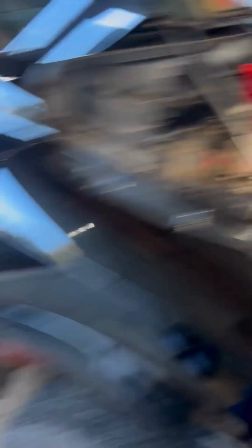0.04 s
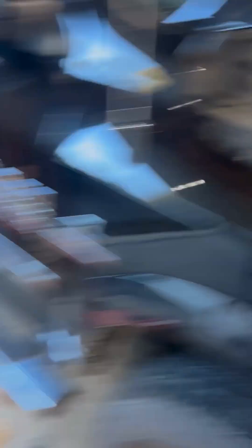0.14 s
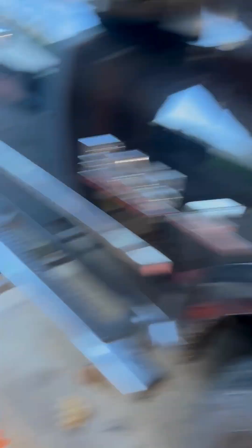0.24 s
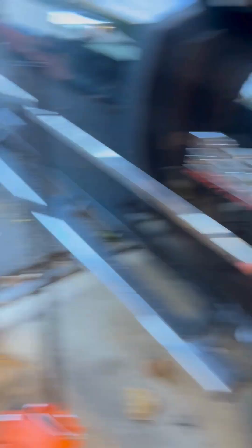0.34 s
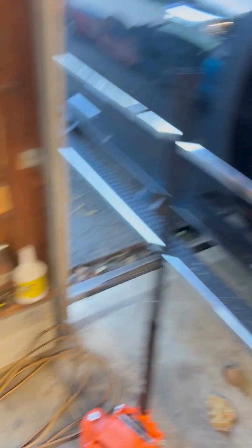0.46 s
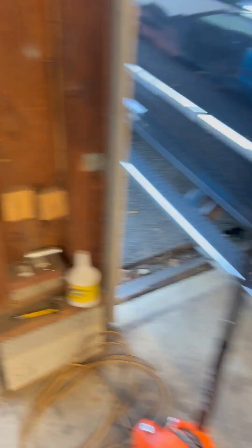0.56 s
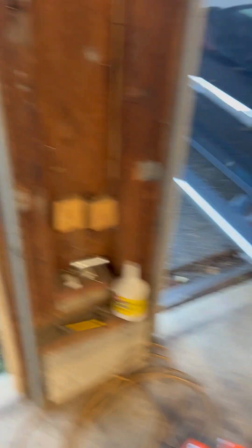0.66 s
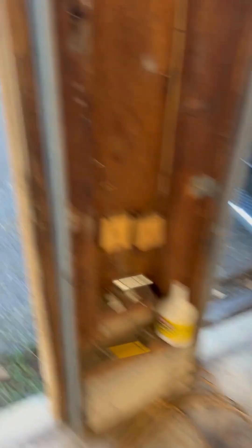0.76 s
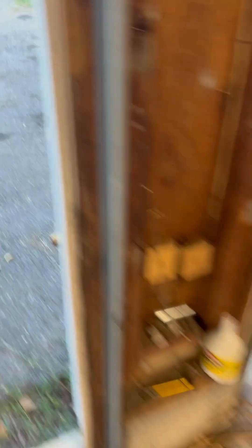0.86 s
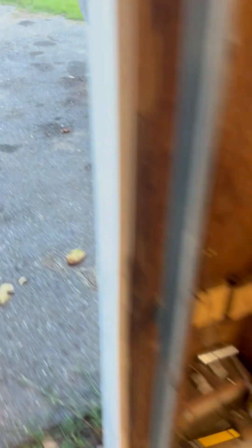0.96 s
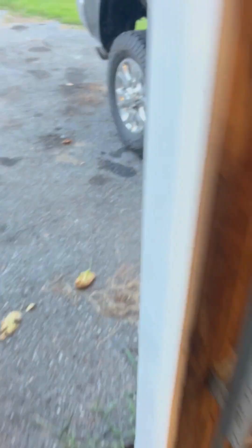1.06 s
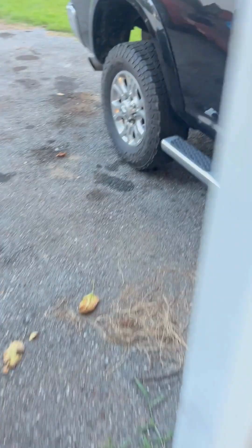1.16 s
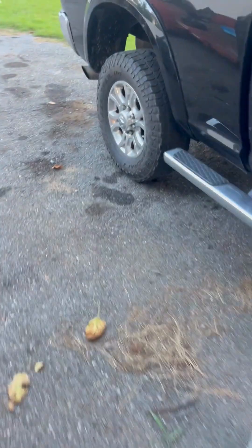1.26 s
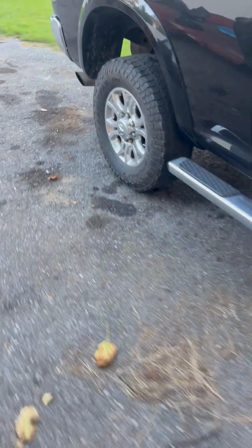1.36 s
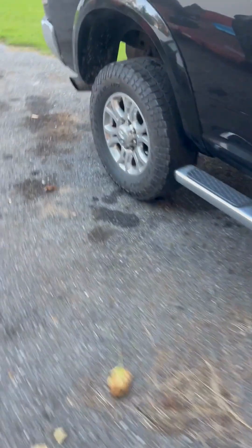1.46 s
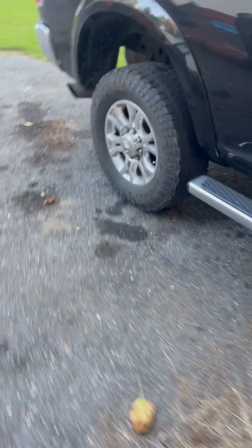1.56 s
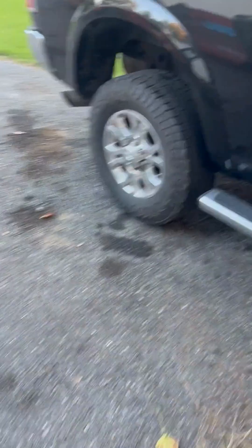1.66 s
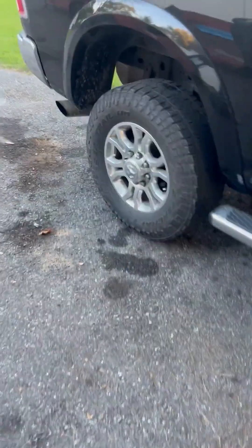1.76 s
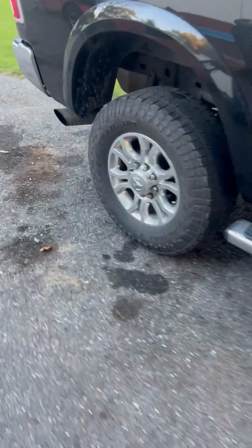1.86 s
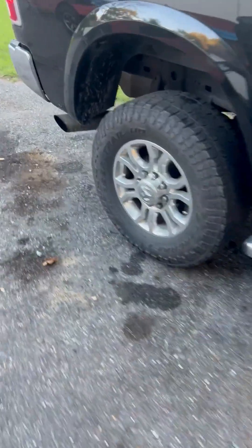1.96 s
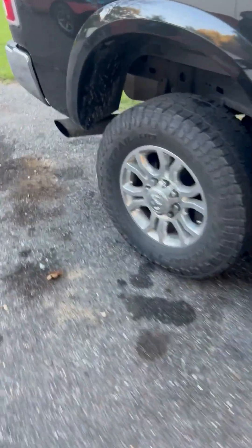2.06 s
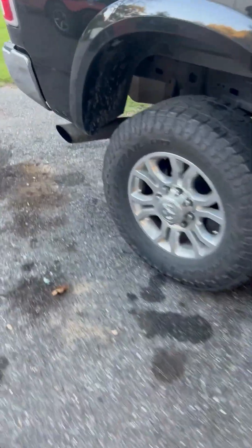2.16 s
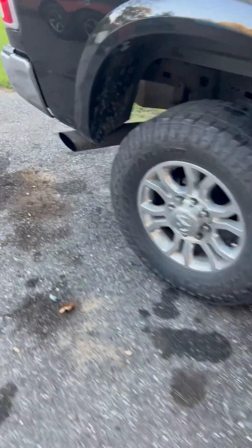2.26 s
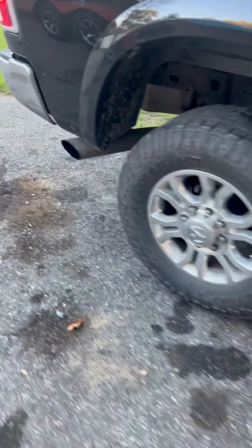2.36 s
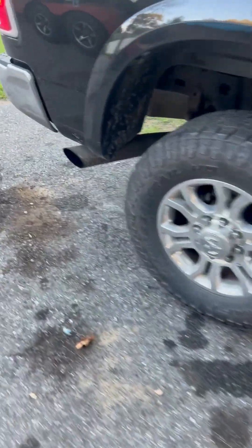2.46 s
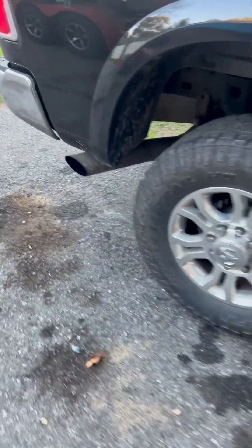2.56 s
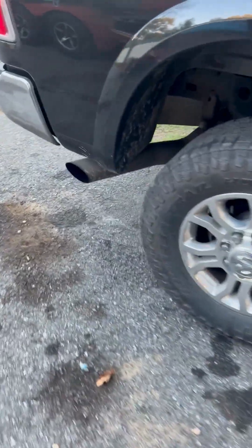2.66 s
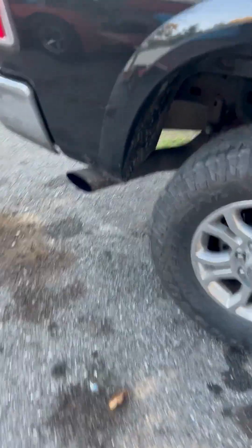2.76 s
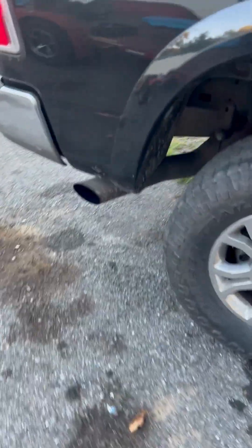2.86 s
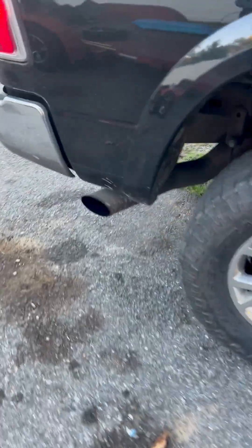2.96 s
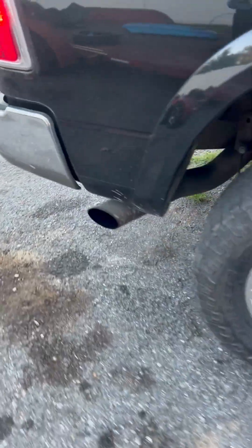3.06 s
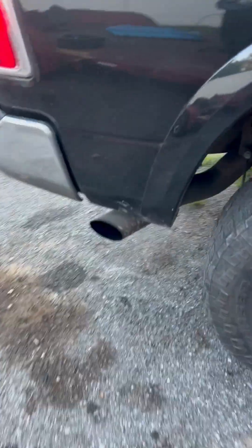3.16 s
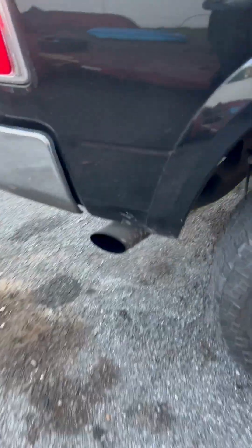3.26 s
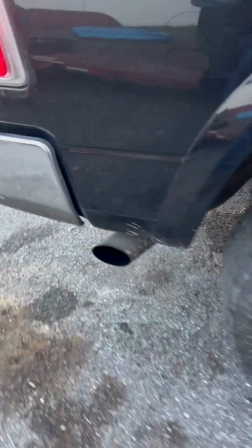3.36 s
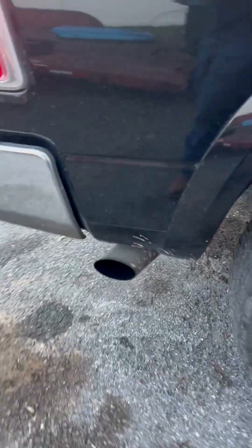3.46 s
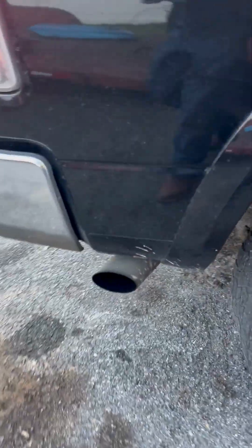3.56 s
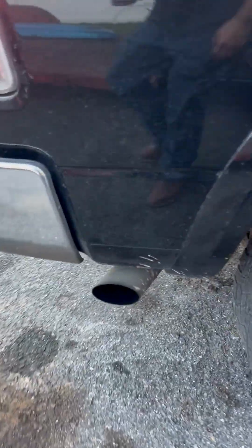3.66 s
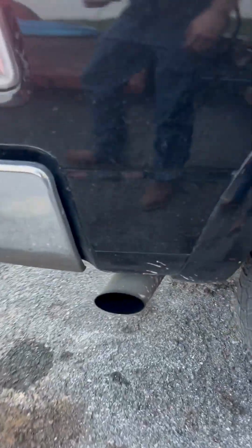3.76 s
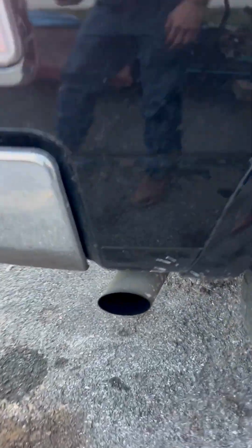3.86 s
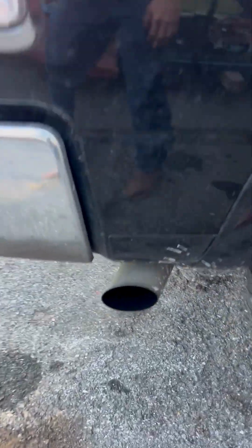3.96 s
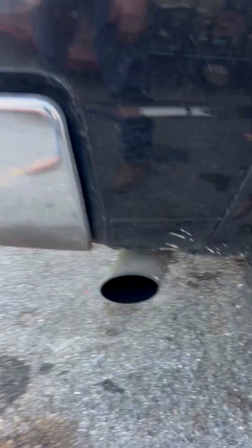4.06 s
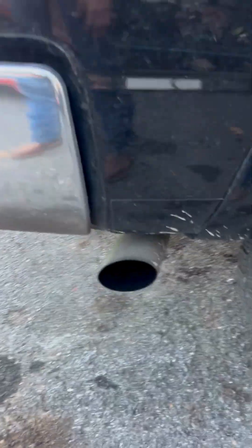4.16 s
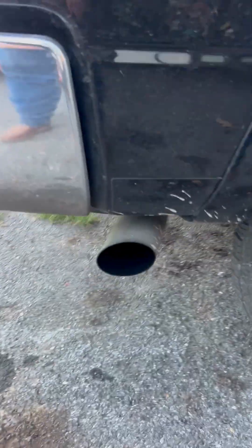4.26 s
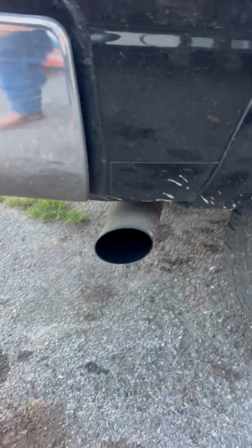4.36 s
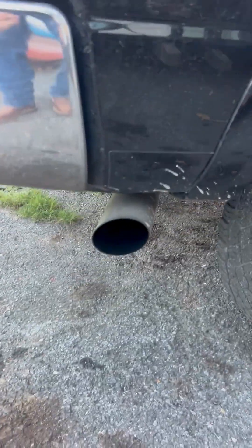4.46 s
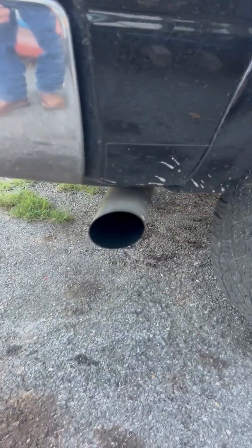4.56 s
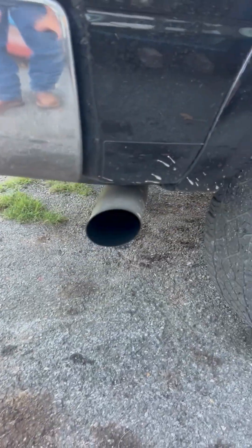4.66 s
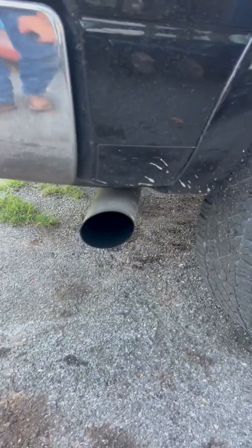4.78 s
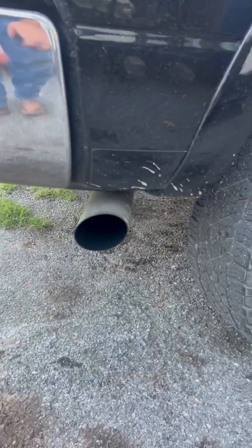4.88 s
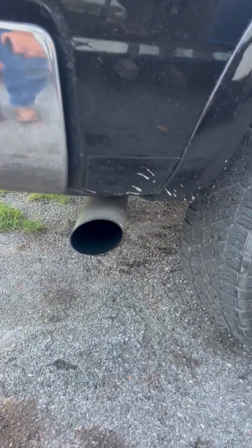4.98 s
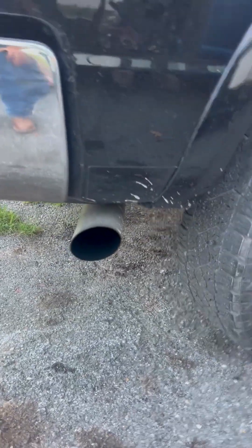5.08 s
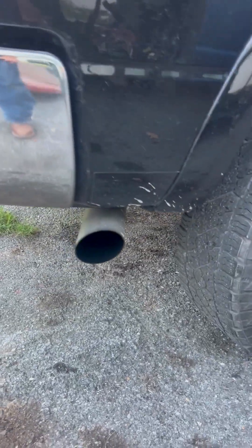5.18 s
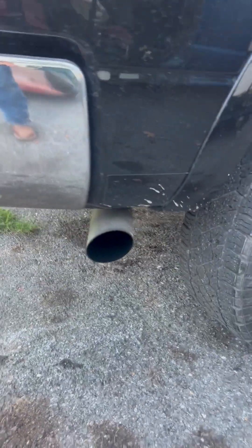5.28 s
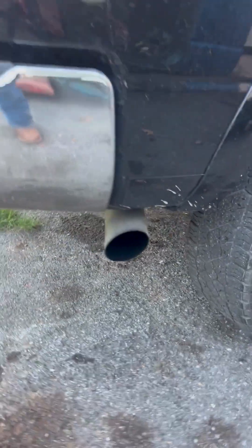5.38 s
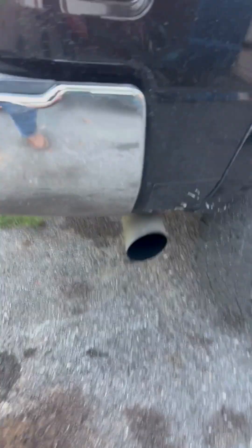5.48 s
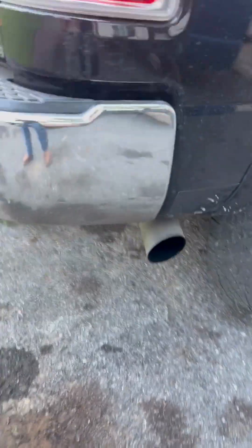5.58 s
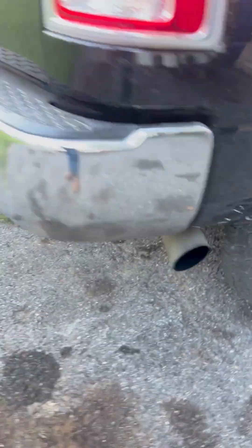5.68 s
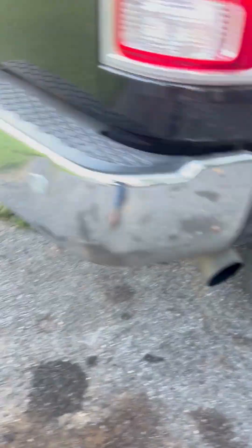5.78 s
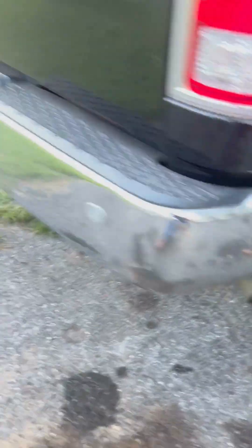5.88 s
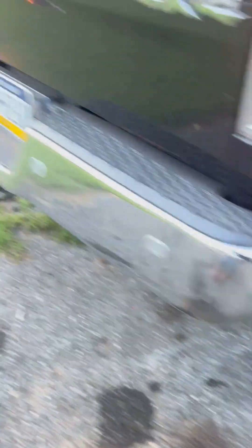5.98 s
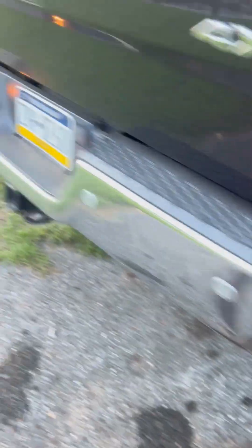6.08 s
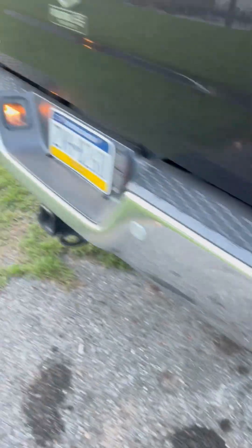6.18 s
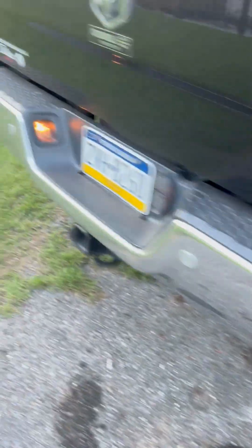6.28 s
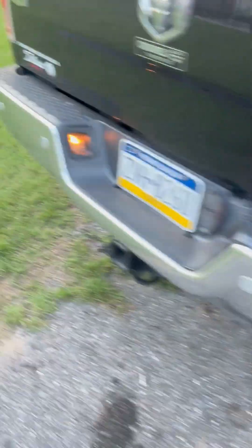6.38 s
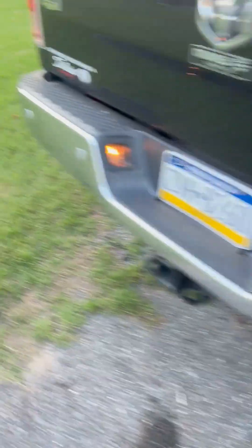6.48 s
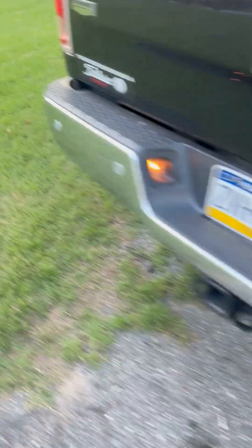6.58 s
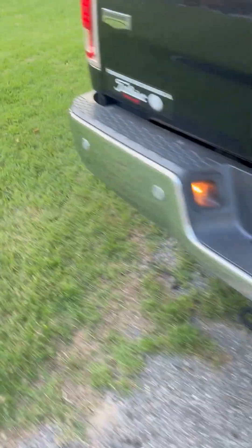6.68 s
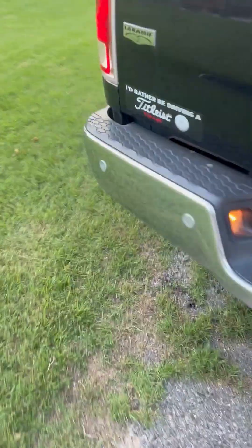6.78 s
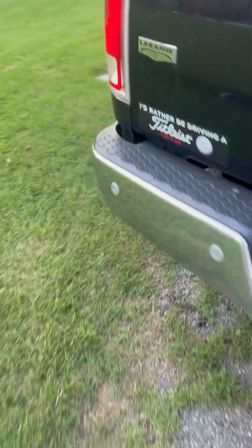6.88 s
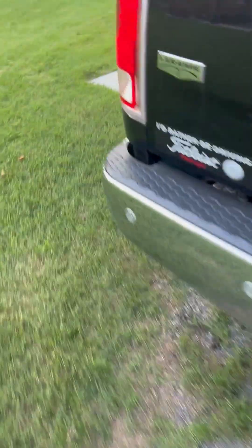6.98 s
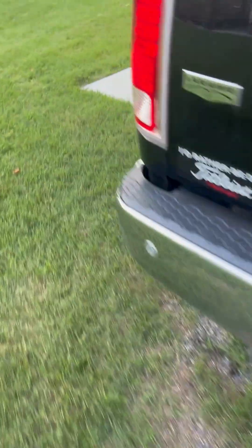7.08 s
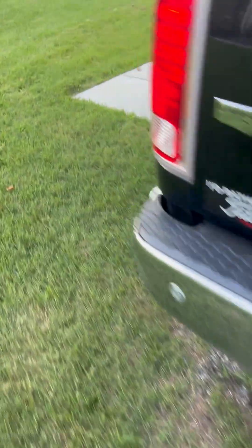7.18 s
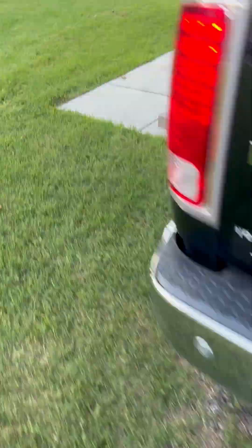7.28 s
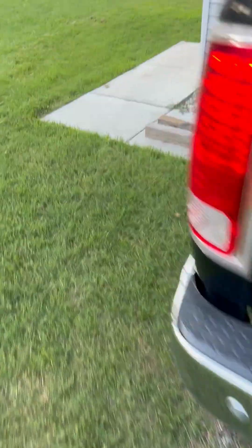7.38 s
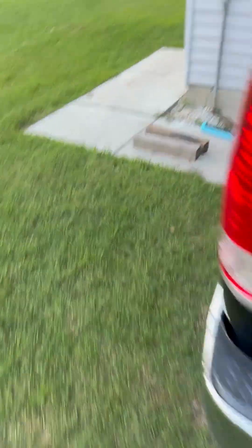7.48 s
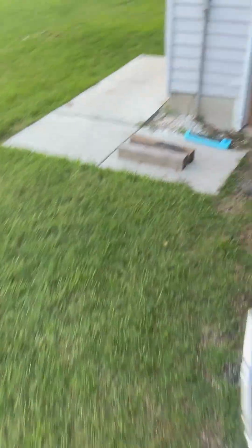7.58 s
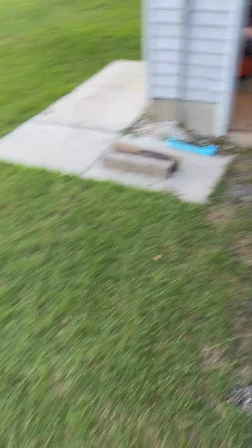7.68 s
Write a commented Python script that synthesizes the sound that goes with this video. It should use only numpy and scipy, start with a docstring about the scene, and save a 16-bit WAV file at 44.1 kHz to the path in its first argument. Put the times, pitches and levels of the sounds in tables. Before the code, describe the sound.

Continuous diesel truck idle, low and lumpy, about thirty-five firings a second. Clattering valves and a faint fan hum lead at first; very high ticks fade almost at once. The moving microphone nears the exhaust mouth, where puffing gas turns rough, airy and close, then passes behind the bumper, leaving a softer, darker boom. Open driveway, dry sound, only a slight gravel reflection.

```python
"""A deep, throbbing boom and an engine's clatter come first: a six-cylinder diesel pickup idles at 700 rpm.
The listener walks from the engine end, past the tailpipe, to behind the truck.
Each firing excites boom, drone, burble and knock resonances as an impulse; gas noise leaves in puffs.
Clatter and high ticks are noise gated by the engine cycle; the fan is a sine tone."""
import sys
import numpy as np
from scipy import signal
from scipy.fft import rfft, irfft, next_fast_len
from scipy.io import wavfile
from scipy.ndimage import uniform_filter1d

SR = 44100
rng = np.random.default_rng(int(sys.argv[2]) if len(sys.argv) > 2 else 0)


def digitize_waveform(pressure):
    """Quantize a signal to 16-bit integers and store it at the path in sys.argv[1].

    Rows of a 2-D input are taken as channels; values are limited to [-1, 1].
    """
    field = np.atleast_2d(pressure).T
    bounded = np.clip(field, -1, 1)
    quanta = np.round(bounded * 32767).astype(np.int16)
    wavfile.write(sys.argv[1], SR, quanta)


N = 340893

CYCLE_HZ = 5.845  # all six cylinders fire once in a cycle of two crank turns
# the walk: (time [s], distance to the tailpipe [m], treble loss away from the pipe's mouth [dB],
# engine clatter level [dB])
WALK = [(0, 3.3, 17, -25), (.35, 2.94, 9, -27), (1.3, 1.98, 7.5, -31), (2.1, 1.67, 6.5, -30.5),
        (2.9, 1.21, 2, -29.5), (3.6, 1.08, 0.4, -29), (4.1, 0.99, -2.2, -31), (5.2, 1.05, -0.8, -35.5),
        (5.75, 1.29, 3, -36), (6.3, 1.54, 13, -41), (6.7, 2.1, 18, -40), (7.3, 2.33, 21, -44),
        (7.73, 2.7, 19, -41)]


def gain_of(db):
    """Level definition: 20 dB is a factor of ten in amplitude."""
    return 10 ** (np.asarray(db) / 20)


def evened(x):
    """Normalization to unit root-mean-square amplitude."""
    return x / np.sqrt(np.mean(x ** 2) + 1e-20)


def along(table, t):
    """Linear interpolation in time of every column after the first."""
    s, *columns = np.transpose(table)
    return [np.interp(t, s, c) for c in columns]


def read(points, hz):
    """Linear interpolation of level on a logarithmic frequency axis."""
    f, db = np.transpose(points)
    return np.interp(np.log(hz + 1), np.log(f + 1), db)


def noise(shape_db, patchy_db):
    """Spectral shaping: random short-time spectra take the colour shape_db(hz, s) and uneven patches."""
    hop, window = 256, 1024
    frames = N // hop + 5
    hz = np.fft.rfftfreq(window, 1 / SR)[:, None]
    real, imaginary, patches = rng.standard_normal((frames, 513, 3)).T
    patches = uniform_filter1d(patches, size=4, axis=0)  # smooth over frequency
    patches = evened(uniform_filter1d(patches, size=9, axis=1))  # and over time
    frame_s = np.arange(frames) * hop / SR
    colour = gain_of(shape_db(hz, frame_s) + np.zeros(frames))
    colour = colour / np.sqrt((colour ** 2).mean(0))  # equal power in every frame
    spectra = (real + 1j * imaginary) * colour * gain_of(patchy_db * patches)
    return evened(signal.istft(spectra, nperseg=window, noverlap=window - hop)[1][:N])


def cycles(t):
    """Phase of the engine: cycles run by time t, shifted as idle speed and distance drift."""
    # lateness of the firings: (time [s], lag [ms])
    firing_lag = [(0, 3.7), (.5, 3.6), (1.1, 2.2), (1.75, .1), (2.6, -.9), (3.5, -2.5), (4.4, -1.4),
                  (5.9, 2.0), (7.1, 6.4), (7.73, 8.3)]
    return CYCLE_HZ * (t - along(firing_lag, t)[0] / 1000)


def puffs(per_cycle, late, rise, fall, uneven_db, pattern_db=(0,)):
    """Periodic amplitude modulation: each puff swells and decays; late, rise, fall are shares of a period."""
    turn = per_cycle * cycles(np.arange(N) / SR) - late + 1
    size = gain_of(uneven_db * rng.standard_normal(400) + np.resize(pattern_db, 400))

    def shape(u):
        return (1 - np.exp(-u / rise)) ** 2 * np.exp(-u / fall)

    count = turn.astype(int)
    phase = turn % 1
    previous_tail = size[count] * shape(phase + 1)
    return size[count + 1] * shape(phase) + previous_tail


def ring(modes, cylinder_db, lag_ms, uneven_db, uneven_ms):
    """Modal response: one impulse a firing is convolved with a sum of damped resonances."""
    lead = SR  # the engine runs one second ahead, so that the resonances already ring
    t = np.arange(-lead, N) / SR
    firing = np.arange(-30, 276)
    cylinder = firing % 6
    chance = rng.standard_normal((len(firing), 2))
    delay_ms = lag_ms[cylinder] + uneven_ms * chance[:, 0]
    s = np.interp(firing / 6, cycles(t), t) + delay_ms / 1000
    strength = gain_of(cylinder_db[cylinder] + uneven_db * chance[:, 1])
    size = next_fast_len(len(t) + SR)
    clicks = np.bincount(np.round(s * SR).astype(int) + lead, strength, size)
    f = np.fft.rfftfreq(size, 1 / SR)
    response = 0
    for hz, width, db, sign in modes:
        response = response + sign * gain_of(db) * 1j * f * width / (hz ** 2 - f ** 2 + 1j * f * width)
    cutoff = 1.17 * max(mode[0] for mode in modes)
    response = response / (1 + (f / cutoff) ** 6)  # the gas pulse is blunt
    return evened(irfft(rfft(clicks[:size]) * response, size)[lead:lead + N])


def heard(layer, t):
    """Spreading and directivity: a layer weakens with distance and away from the pipe's mouth."""
    # tailpipe layers: (level at 1 m with no treble loss [dB], distance exponent [-],
    # share of the treble loss [-])
    layers = {"boom": (-9, 1, .01), "drone": (-27, 0.29, 0.27), "burble": (-25.5, 1.96, 0.17),
              "rasp": (-26.5, 1.2, 0.33), "hiss": (-28.5, 1.11, 0.94)}
    db, spread, aim = layers[layer]
    metres, aside_db = along(WALK, t)[:2]
    return gain_of(db - aim * aside_db) / metres ** spread


def fan(t):
    """Pure tone: the fan's hum is one sinusoid of varying level."""
    # fan hum: (time [s], rms level [dB])
    hum_level = [(0, -35.5), (1.1, -28), (1.8, -38), (3.3, -32), (6, -39.5), (7.1, -30), (7.73, -37)]
    hum_hz = 155
    amplitude = np.sqrt(2) * gain_of(along(hum_level, t)[0])
    return amplitude * np.sin(2 * np.pi * hum_hz * t)


def ticks(t):
    """Gated narrow-band noise: a short, very high chirrup on every crank turn, fading over time."""
    start_db, fade_s = -41.5, .1
    bright = noise(lambda hz, s: -12 * np.log10(1 + ((hz - 13200) / 500) ** 2), patchy_db=-0.5)
    gate = puffs(2, late=.25, rise=.04, fall=.1, uneven_db=3.0)
    fade = 1 / (1 + t / fade_s)
    return gain_of(start_db) * fade * evened(bright * gate)


def clatter(t):
    """Modulated noise: valves, injectors and belts throb with the firings, duller close to the tailpipe."""
    # engine noise density, far from and near the tailpipe: (frequency [Hz], relative level [dB per Hz])
    far_spectrum = [(20, -8), (60, -3.5), (150, 12), (400, 8.5), (550, 6), (1000, 4), (2100, -3),
                    (2800, -16.5), (4000, -14.5), (4800, -11), (7500, -15), (9500, -20), (13000, -14),
                    (15500, -17.5)]
    near_spectrum = [(20, 3), (60, -1), (150, 10.5), (400, 10), (800, -10.5), (1300, -0.5), (1900, -9.5),
                     (2500, -10), (3300, -7.5), (4200, -17.5), (5100, -4), (8000, -22.5), (15500, -41)]
    near_m = 0.65  # at this distance from the tailpipe only the near spectrum would remain

    def colour_db(hz, s):
        nearness = np.clip(near_m / along(WALK, s)[0], 0, 1)
        return read(far_spectrum, hz) * (1 - nearness) + read(near_spectrum, hz) * nearness

    rattle = noise(colour_db, patchy_db=2.56)
    gate = 1.5 + puffs(6, late=-0.03, rise=0.12, fall=0.26, uneven_db=5.5)
    return gain_of(along(WALK, t)[2]) * evened(rattle * gate)


def ground_echo(direct, t):
    """Image source: a reflection off the gravel arrives later by the extra path length."""
    pipe_height_m, ear_height_m, sound_m_per_s = 0.243, 0.73, 343
    gravel, aside_scale_db = 0.18, 2.5  # greatest echo strength; treble loss over which it comes in
    metres, aside_db = along(WALK, t)[:2]
    detour_m = np.sqrt(metres ** 2 + 4 * pipe_height_m * ear_height_m) - metres
    strength = gravel * (1 - np.exp(-np.maximum(aside_db, 0) / aside_scale_db))
    dull = signal.lfilter(*signal.butter(1, 2400, fs=SR), direct)  # gravel scatters the treble
    return strength * np.interp(t - detour_m / sound_m_per_s, t, dull)


def tailpipe(t):
    """Pulsating flow noise: gas rushes out after each firing as rasp and hiss coloured by pipe resonances."""
    # noise density before the resonances: (frequency [Hz], relative level [dB per Hz])
    rasp_spectrum = [(150, -14.5), (330, 10.5), (520, 1.5), (700, 0.5), (1050, -2.5), (1180, -32),
                     (1330, -10), (1900, -8), (2300, -18), (3000, -29), (6000, -61)]
    hiss_spectrum = [(800, -52), (2000, -9.5), (2600, -16.5), (3100, -2.5), (4000, -6), (5000, -6),
                     (6500, -11), (8500, -5.5), (12500, -8.5), (15500, -2)]
    # pipe resonances: (frequency [Hz], width [Hz], height [dB])
    pipe_resonances = [(714, 170, 3.6), (929, 52, 7.8), (1068, 36, 9.3), (1350, 55, 5.9), (1494, 49, 8.9),
                       (1832, 38, 18.4), (1980, 34, 3), (3120, 250, 4.2), (3510, 52, 8.7), (3830, 63, 4.8),
                       (4600, 48, 2.2), (4940, 52, 7.7)]
    # strength of the gas rush, one entry a cylinder: (relative level [dB])
    rush_pattern = [0.6, -2.2, 0.8, -1.5, -1.5, 0.3]
    spit_db, spit_ms = 1, 2.5  # the hiss breaks into short grains

    def humps(hz):
        return sum(db / (1 + (2 * (hz - f) / width) ** 2) for f, width, db in pipe_resonances)

    rasp = noise(lambda hz, s: read(rasp_spectrum, hz) + humps(hz), patchy_db=2.5)
    hiss = noise(lambda hz, s: read(hiss_spectrum, hz) + humps(hz), patchy_db=2.6)
    grain_samples = max(1, round(spit_ms * SR / 1000))
    grains = evened(uniform_filter1d(rng.standard_normal(N), size=grain_samples))
    hiss = hiss * gain_of(spit_db * grains)
    rush = puffs(6, late=-0.21, rise=0.2, fall=0.33, uneven_db=1.0, pattern_db=rush_pattern)
    # a steady share flows between the puffs
    gated_rasp = evened(rasp * (0.23 + rush))
    gated_hiss = evened(hiss * (0.059 + rush))
    direct = heard("rasp", t) * gated_rasp + heard("hiss", t) * gated_hiss
    return direct + ground_echo(direct, t)


def exhaust(t):
    """Impulse-excited resonance: each firing rings boom, drone, burble and a knock."""
    # one row a cylinder in firing order, each with its own way through the manifold:
    # (boom [dB], lag [ms], drone [dB], lag [ms], burble [dB], lag [ms], knock [dB], lag [ms])
    cylinders = [(-1.0, .6, -1.3, 16.56, -12, 30, -2.5, 21), (-8, 2.5, -2.6, 22.33, -6, 14, -13, 20),
                 (-.5, 1.68, -.9, 25.72, -11, 18, -2.5, 20.5), (-11, -3.65, -4.8, 26.47, -14, 18, -12, 27),
                 (-1, 2.5, 0, 35.78, -8, 23.1, 0, 21.9), (-5.5, -3.5, -2.6, 24.06, 0, 27, -11, 23)]
    # resonances: (frequency [Hz], width [Hz], relative level [dB], signed weight [-])
    boom_modes = [(40.3, 3.7, -10, 0.98), (68.7, 3, 8, 0.33), (109.1, 24.4, 4.5, -0.76),
                  (125.4, 19.2, 3, 0.82), (139.83, 2.7, -2, -0.52)]
    drone_modes = [(156.2, 9, -10, -1.13), (191.5, 8.4, 2.5, -0.61), (210.3, 7.9, -9.5, 1),
                   (239.1, 5.2, -2.5, 0.38), (259.7, 11.8, -5, 0.85), (291.7, 9.5, -10.5, -1.28)]
    burble_modes = [(358, 30, 0, -1), (392, 36, 0, 1), (497, 30, -6, 1)]
    knock_modes = [(630, 10, -2, 1), (712, 40, 0, 1), (775, 30, -8, -1)]
    # random spread between firings, rows boom, drone, burble, knock: (level [dB], timing [ms])
    uneven = [(.6, .06), (1.2, .1), (1.0, .08), (1.6, .15)]
    # the knock swells along the walk: (strongest at [s], half length [s], level [dB])
    knock_swells = [(2.05, .75, -33), (3.95, .6, -35), (5.4, .5, -40), (6.8, .3, -43), (7.6, .35, -46)]
    # the drone swells beside the muffler: (nearest at [s], half length [s], gain [dB])
    muffler = (2.22, 2.3, 2.3)
    # the burble drops out beside the rear wheel: (deepest at [s], half length [s], depth [dB])
    burble_dip = (1.63, 0.51, 30)

    def bell(s, width):
        return np.exp(-((t - s) / width) ** 4)

    swell_s, swell_width, swell_db = muffler
    dip_s, dip_width, dip_db = burble_dip
    boom = heard("boom", t)
    drone = heard("drone", t) * gain_of(swell_db * bell(swell_s, swell_width))
    burble = heard("burble", t) / gain_of(dip_db * bell(dip_s, dip_width))
    knock = gain_of(-55)  # knock level between the swells
    for s, width, db in knock_swells:
        knock = knock + gain_of(db) * bell(s, width)

    columns = np.transpose(cylinders)
    modes_of = (boom_modes, drone_modes, burble_modes, knock_modes)
    parts = zip(modes_of, columns[::2], columns[1::2], uneven, (boom, drone, burble, knock))
    return sum(level * ring(modes, db, ms, *spread) for modes, db, ms, spread, level in parts)


def scene():
    """Superposition: the pressures of all sources add at one microphone."""
    t = np.arange(N) / SR
    return (fan(t) + ticks(t) + clatter(t) + tailpipe(t) + exhaust(t))[None]


def record(dry):
    """Saturation and filtering: the preamplifier rounds peaks; three narrow treble bands are missing."""
    # notches: (frequency [Hz], width [Hz], steepness [-])
    notches = [(5997, 670, 1.38), (10260, 1270, 1.46), (15020, 1800, 2.1)]
    edge_hz = 15780  # upper band limit
    over = np.maximum(abs(dry) - .7, 0)
    rounded = dry - np.sign(dry) * (over - .2 * np.tanh(over / .2))
    f = np.linspace(0, SR / 2, 1025)
    colour = np.ones(len(f))
    for hz, width, steep in notches:
        offset = (f - hz) ** 2
        colour = colour * (offset / (offset + width ** 2)) ** (steep / 2)
    colour[-1] = 0
    notch_filter = signal.firwin2(1023, f, colour, fs=SR)
    coloured = signal.oaconvolve(rounded, notch_filter[None], "same")
    band_limit = signal.firwin(2047, edge_hz, window=("kaiser", 9), fs=SR)
    return signal.oaconvolve(coloured, band_limit[None], "same")


dry = scene()
out = record(dry)
digitize_waveform(out)
```